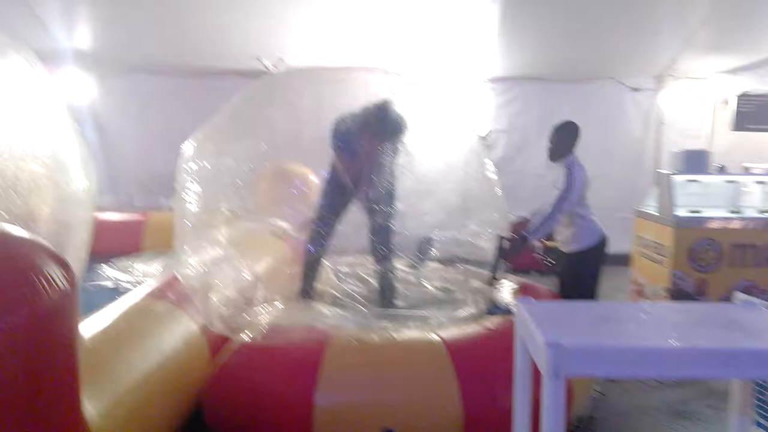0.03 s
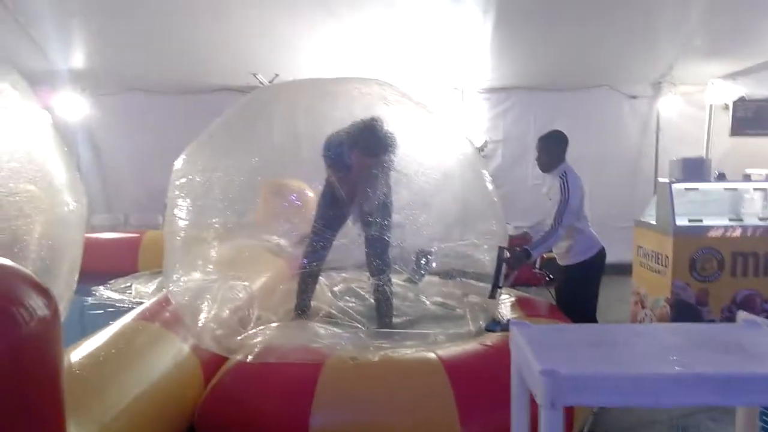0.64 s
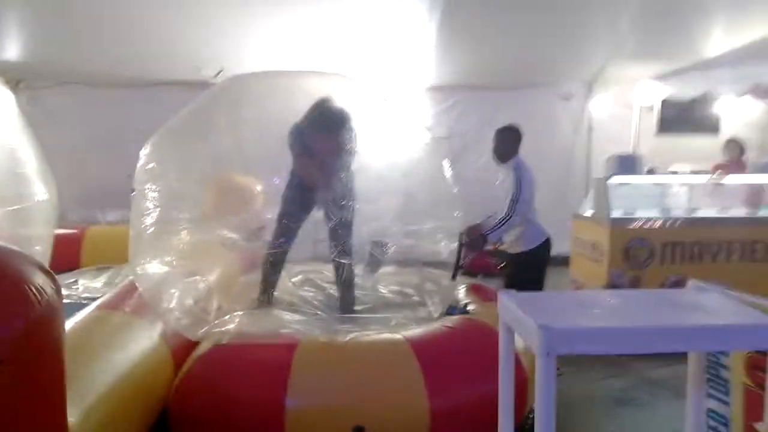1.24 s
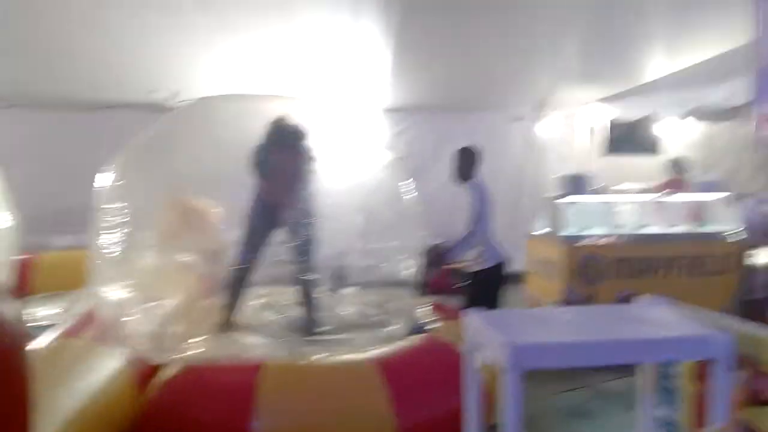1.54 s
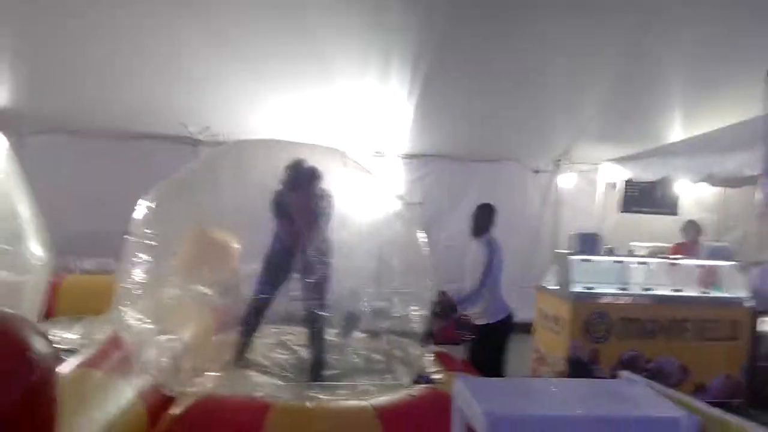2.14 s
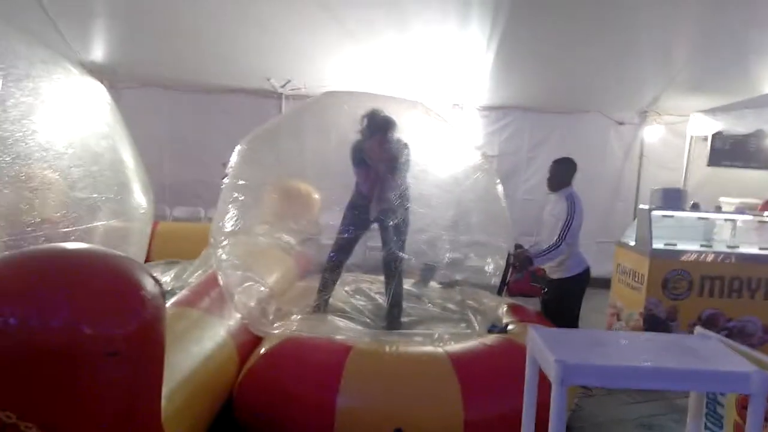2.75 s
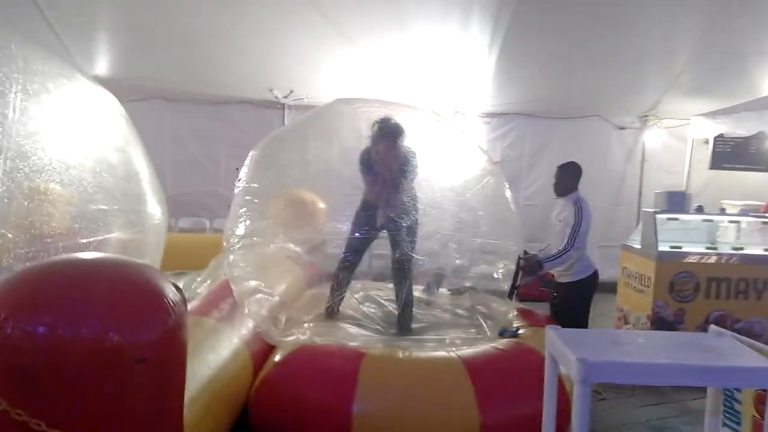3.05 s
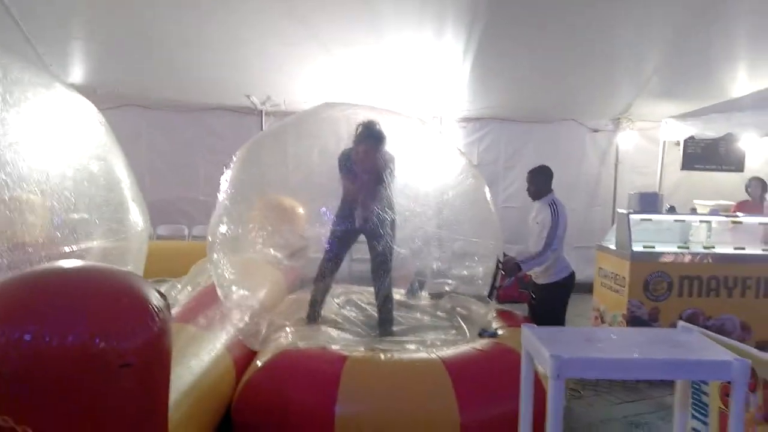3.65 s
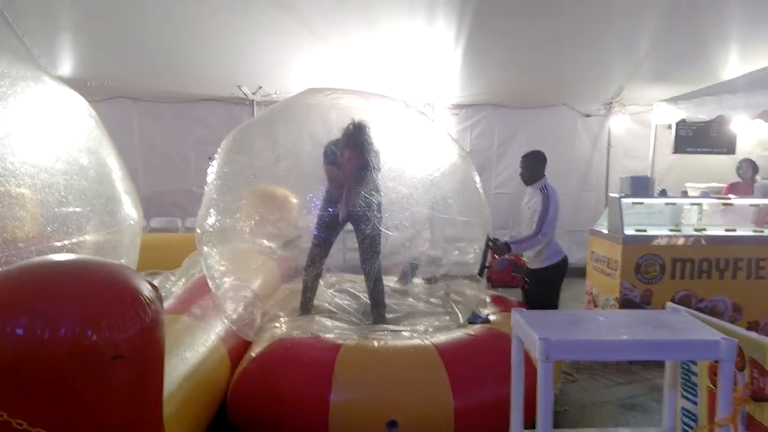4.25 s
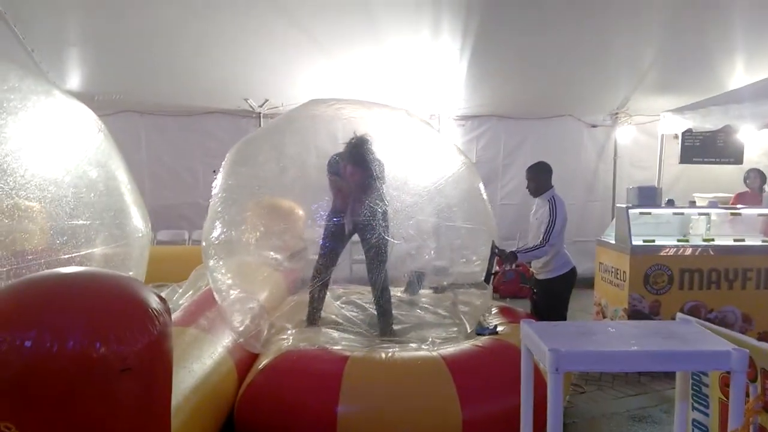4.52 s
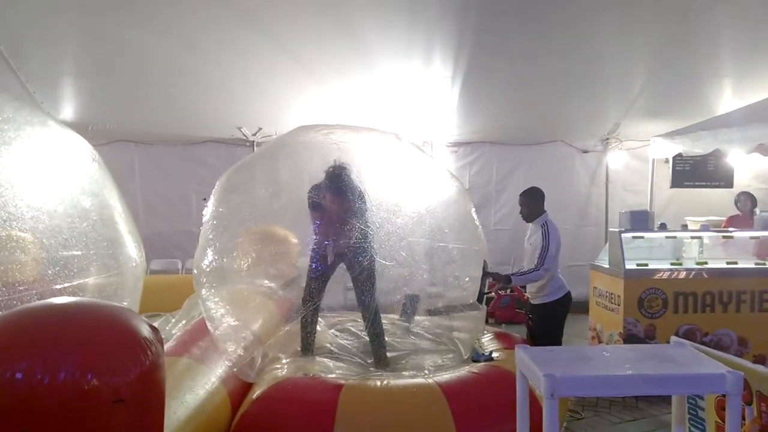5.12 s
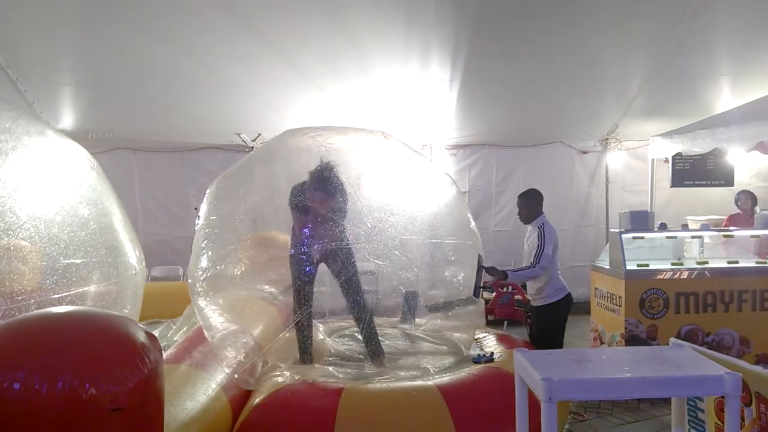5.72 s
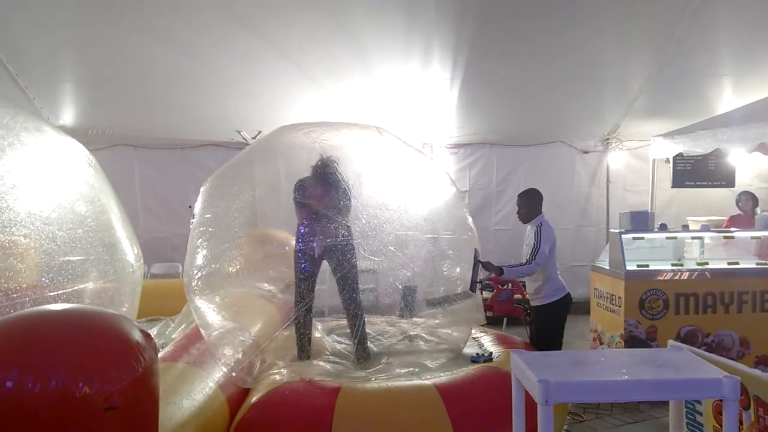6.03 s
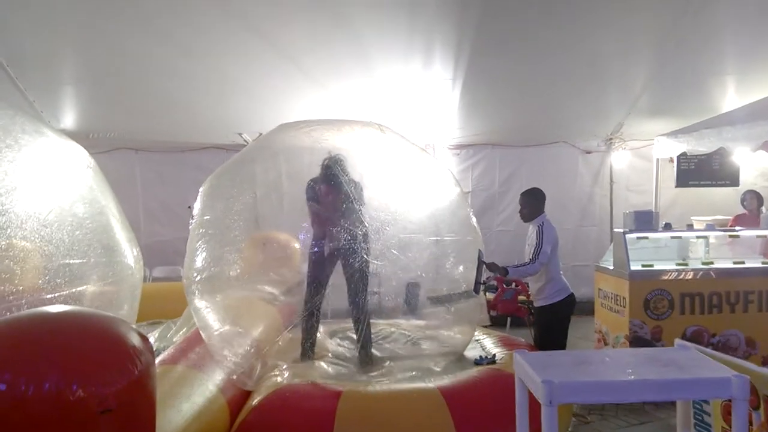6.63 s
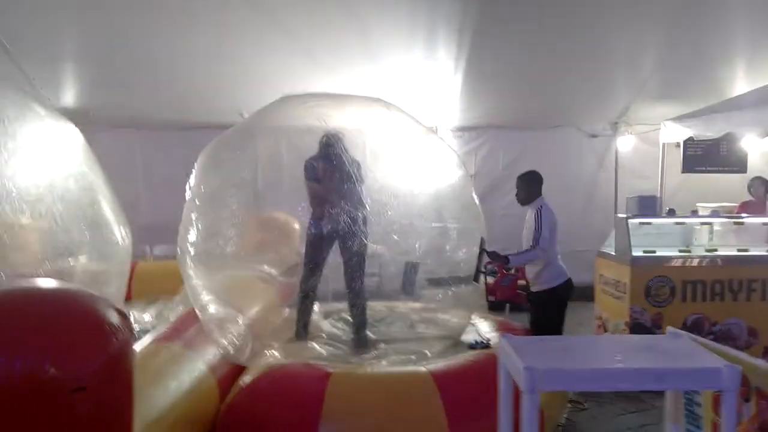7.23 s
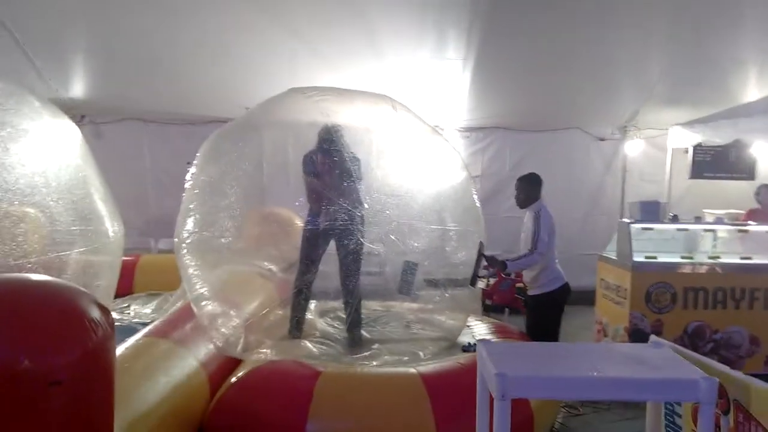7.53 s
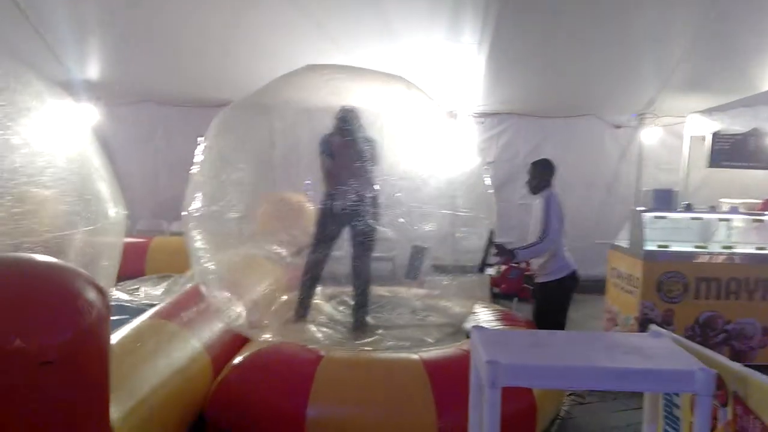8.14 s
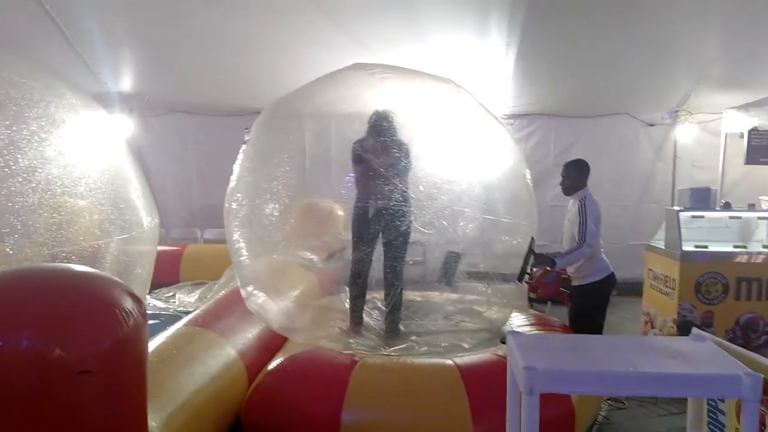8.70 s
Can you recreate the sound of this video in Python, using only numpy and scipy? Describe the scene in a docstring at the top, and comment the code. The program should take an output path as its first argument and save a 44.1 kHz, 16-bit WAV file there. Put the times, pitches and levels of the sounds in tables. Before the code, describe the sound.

An electric blower roars steadily, with hissing air, a high fan whine and a faint generator hum behind it.

```python
"""A roar of air cuts in abruptly, with a jet's hiss and a fan's whine: an electric blower is filling an
inflatable ball in a large tent. Turbulence rings the hose and housing, the blades chop the air into a
tone, and a generator's engine hums further off. Tones swell and sink as a hand-held camera carries its
two microphone ports through the tent's standing waves. At first a finger shades the ports; later the
camera takes one soft bump."""
import sys
import numpy as np
from scipy import signal
from scipy.fft import rfft, irfft, next_fast_len
from scipy.io import wavfile
from scipy.ndimage import uniform_filter1d, map_coordinates

SR = 44100
rng = np.random.default_rng(int(sys.argv[2]) if len(sys.argv) > 2 else 0)


def wav_out(sig):
    """Save sig, one row per channel (or a flat mono array), as 16-bit PCM at SR to the path in sys.argv[1]."""
    wavfile.write(sys.argv[1], SR, np.round(np.clip(np.atleast_2d(sig).T, -1, 1) * 32767).astype(np.int16))


N = 395577

# Level rides of the air layers. Each row: time in seconds, level in dB before trims and swells.
STREAM_RIDE = [(0.8, -22.2), (0.865, -22.2), (0.89, -24.2), (1.02, -24.2), (1.28, -21.8), (1.37, -23.6),
               (1.52, -21.4), (2.0, -20.5), (2.2, -18.3), (2.6, -20), (2.92, -20.5), (3.02, -18.5),
               (3.38, -19.6), (3.54, -22), (3.7, -19.9), (4.06, -18.5), (4.18, -19.8), (4.7, -19.7),
               (4.85, -20.6), (5.33, -21), (5.43, -19.5), (5.55, -20.2), (5.95, -20.8), (6.86, -20.8),
               (7.15, -19.5), (7.36, -20.3), (8.56, -19.8), (8.64, -18.4), (8.96, -20.3)]  # the roar; rumble, blade rush and hiss follow it
RUMBLE_RIDE = [(0.8, -30.5), (1.4, -32), (2.1, -28), (2.7, -32), (3.15, -28), (4.0, -29), (4.6, -26.5),
               (6.1, -29), (7.5, -30.5), (8.2, -30), (8.97, -28)]
LOWER_NOTE_RIDE = [(0.8, -41), (1.98, -44), (2.34, -35), (2.72, -46), (2.96, -27), (3.25, -27), (3.64, -35),
                   (4.1, -25), (4.48, -30.5), (5.16, -35), (5.5, -24.5), (5.85, -31.5), (8.96, -42)]
UPPER_NOTE_RIDE = [(0.8, -33), (1.3, -30), (1.5, -24), (2.3, -25), (2.8, -33), (3.42, -22), (4.0, -23.5),
                   (4.66, -32), (5.5, -27.5), (8.96, -28.5)]
BLADE_RUSH_RIDE = [(0.8, -29), (2.1, -27), (4.2, -27), (6.2, -24.5), (8.97, -26)]
HISS_RIDE = [(0.8, -24.4), (1.0, -26), (1.14, -24.3), (1.27, -24.6), (1.4, -24), (1.55, -24), (1.72, -28.3),
             (2.3, -27.8), (3.25, -26.7), (4.1, -27.8), (5.2, -27.7), (6.2, -27), (7.2, -28), (8.0, -28),
             (8.97, -26.8)]
# EQ curves that colour their noise. Each row: frequency in Hz, relative gain in dB.
RUMBLE_EQ = [(20, -17), (42, -9), (75, 0.5), (160, -1), (260, 0.5), (350, 2), (600, -7), (2000, -58)]
ROAR_EQ = [(100, -40), (260, -18), (340, -11), (450, 1.5), (750, 0), (1080, -0.5), (1350, -4), (1700, -12),
           (2300, -9), (3000, -36)]
LOWER_NOTE_EQ = [(440, -43), (495, -8), (515, 8), (535, -1.5), (600, -43)]
UPPER_NOTE_EQ = [(570, -49), (625, -5), (640, 0), (652, 3), (663, 0), (680, -6), (740, -47)]
BLADE_RUSH_EQ = [(900, -64), (1400, -4), (1560, 0.5), (1720, 3.5), (1950, -3), (2300, -6), (2550, -12.5),
                 (3500, -60)]
HISS_EQ = [(1500, -17), (2500, 0.5), (3500, 0), (4400, -1), (5200, -2), (6000, -1.5), (7300, -3.5),
           (8200, -5.5), (8700, -4.5), (9900, -6), (10900, -9.5), (11900, -9), (13000, -13), (15300, -18)]
# Resonances. Each row: centre in Hz, width in Hz, boost or cut in dB.
HOUSING_PEAKS = [(410, 13, 3), (454, 12, 2), (812, 12, 5), (845, 14, 2), (907, 13, 5.5), (960, 12, 5.5),
                 (1030, 50, 1.5), (1108, 28, 6), (1245, 14, 2.5), (1290, 19, 4.5)]  # hose and housing
FINGER_HOLLOW = [(3760, 880, 12.3), (5600, 900, 1), (13300, 2200, -14)]  # the cavity between finger and ports
# Stereo image at the ports. Each row: frequency in Hz, coherence from 0 to 1,
# phase lead of the left in radians, left over right in dB.
IMAGE = [(60, .91, .7, 0), (300, .68, .1, .7), (700, .81, 0, -.5), (1250, .99, 0, 0), (1360, .98, 0, .6),
         (1600, .86, 0, 4), (1900, .2, 2.6, 5.5), (2250, .75, 3.4, 3), (2680, .96, 3.1, 0),
         (2900, .8, 2.8, -.5), (3300, .35, 1.7, -1.5), (3900, .79, -.1, -1.5), (4600, .48, -1.2, -.5),
         (5300, .83, -3.1, -1), (6000, .52, -3.2, -1.5), (6700, .26, -5.6, -1), (7400, .39, -4.8, -5),
         (8100, .38, -4.3, -5), (8800, .44, -5.6, -6), (9500, .54, -6.4, -8.5), (10800, .15, -10, -8),
         (12200, .54, -12.6, -6.5), (13500, .4, -14.6, -8), (15000, .3, -18.7, -11)]
IMAGE_ASIDE = [(2250, .65, 3.7, 1), (2680, .92, 3, -1), (3300, .65, 1.4, -2), (3900, .88, -.2, -1.5),
               (4600, .55, -1.3, -2.5), (5300, .45, -3.6, -2), (6700, .55, -6.4, -1), (7400, .3, -8.7, -5),
               (8100, .6, -10, -5.5), (9500, .45, -12.6, -9), (10800, .45, -15.8, -8.5),
               (12200, .38, -18.3, -6), (15000, .4, -25, -5)]  # the hiss from one side, before the camera swings round

# Fan speed. Each row: time in seconds, blade-passing frequency in Hz.
BLADE_PITCH = [(0.8, 1497.3), (1.2, 1495.8), (3.3, 1494.8), (4.1, 1494), (4.9, 1490.7), (5.7, 1492.3),
               (7.6, 1493.2), (8.8, 1490.3)]
# The blade tone's first three harmonics in the standing waves.
# Each row: time in seconds, level in dB before panning.
WHINE_RIDE = [(0.8, -26), (0.98, -36), (1.2, -28.5), (1.8, -40), (2.08, -29), (2.28, -36), (2.8, -28.5),
              (3.15, -32), (3.9, -28), (4.12, -32), (4.38, -23), (4.6, -25), (4.8, -20.5), (5.0, -23.5),
              (5.98, -25), (6.25, -22), (7.17, -20.3), (7.35, -17), (7.55, -18.6), (7.7, -26.5),
              (8.22, -20.8), (8.65, -22.3), (8.9, -29)]
SECOND_RIDE = [(0.9, -53), (1.15, -39.5), (1.7, -48), (2.1, -36.5), (2.26, -47), (2.42, -39), (3.15, -39),
               (3.52, -53), (3.98, -39), (4.5, -50), (5.3, -53), (5.6, -41), (5.78, -44), (6, -36.5),
               (6.55, -55), (7, -41), (7.7, -54), (8.22, -42), (8.96, -49)]
THIRD_RIDE = [(0.8, -44), (1.45, -41), (1.65, -47), (2.3, -40), (2.7, -50), (3.3, -37.5), (3.6, -46),
              (4.12, -39), (4.8, -45), (5.35, -48), (5.65, -38), (5.95, -47), (6.3, -35.5), (6.75, -36.5),
              (7.1, -47), (7.33, -35.5), (7.52, -34), (7.85, -44), (8.7, -39), (8.96, -41)]
# Its weak overtones. Each row: harmonic number, centre level in dB, phase between ports in radians.
WEAK_OVERTONES = [(4, -53, 2.1), (5, -53, 1.4), (6, -52, 1.4), (8, -56.5, 1.4), (10, -65, 1.4)]

# The generator's firing hum and cooling fan. Each row: time in seconds, level in dB before trim.
FIRING_RIDE = [(0.8, -37), (1.5, -48), (1.7, -58), (1.97, -37.5), (3.0, -33), (3.42, -30.5), (3.54, -39),
               (4.2, -43), (4.38, -29.7), (4.95, -30.5), (5.45, -37), (5.95, -37), (6.12, -31.5),
               (6.94, -31), (7.08, -37.5), (8.68, -31.5), (8.96, -41)]
COOLING_RIDE = [(0.8, -45), (1.7, -33), (2.3, -34), (2.6, -46), (6.64, -41), (7.24, -37), (7.9, -48),
                (8.45, -29.5), (8.97, -30)]
# Its weaker tones. Each row: multiple of the four-stroke cycle, level in dB.
ENGINE_PARTIALS = [(5, -54), (6, -46), (7, -47.5), (8, -43), (9, -53), (12, -40.5), (19, -47), (20, -47.5)]

# Brief changes of colour: the treble dips as the finger lifts, then bands brighten as the camera turns.
# Each row: middle in seconds, half length in seconds, centre in Hz, width in Hz, boost or cut in dB.
COLOUR_SHIFTS = [(1.614, 0.082, 8100, 5000, -11.5), (1.92, 0.2, 5800, 800, 4), (2.2, 0.35, 1160, 250, 2),
                 (5.247, 0.27, 820, 45, 7.5), (8.1, 0.79, 790, 35, 2.5), (6.35, 0.76, 7800, 600, 6)]
# The low push of the bump. One row: time in seconds, peak level in dB, pitch in Hz.
BUMP_PUSH = (5.447, -20, 60)

BLADE_COUNT = 6
TIME = np.arange(N) / SR


def amp(db):
    """Decibels to gain."""
    return 10 ** (np.asarray(db) / 20)


def unit(x):
    """Scale so that the mono mix has rms 1."""
    mono = np.atleast_2d(x).mean(axis=0)
    return x / np.sqrt(np.mean(mono ** 2) + 1e-20)


def along(rows, hz):
    """Each column of a frequency table, read at hz on a log axis."""
    freqs, *columns = np.transpose(rows)
    return [np.interp(np.log(hz + 1), np.log(freqs + 1), column) for column in columns]


def ride(rows):
    """An automation curve: straight lines between breakpoints, one value a sample."""
    return np.interp(TIME, *np.transpose(rows))


def wobble(rate):
    """A smooth random curve, rate knots a second."""
    knots = rng.standard_normal(int(N * rate / SR) + 4)
    coarse = np.arange(0, N + 32, 32)
    smooth = map_coordinates(knots, [coarse * rate / SR], mode="nearest")
    return np.interp(np.arange(N), coarse, smooth)


def filtered(x, response):
    """Filter x by a gain given as a function of Hz."""
    size = next_fast_len(N + SR // 4)
    return irfft(rfft(x, size) * response(np.fft.rfftfreq(size, 1 / SR)), size)[..., :N]


def bells(peaks, hz):
    """Boost or cut in dB from a set of resonances."""
    return sum(db / (1 + (2 * (hz - centre) / width) ** 2) for centre, width, db in peaks)


def at_ports(hz, image=IMAGE):
    """Complex left and right gains for the sound the ports share and the sound opposed between them."""
    coherence, lead, tilt_db = along(image, hz)
    spread = np.arccos(np.clip(coherence, 0, 1)) / 2
    sides = np.array([amp(tilt_db / 2) * np.exp(.5j * lead), amp(-tilt_db / 2) * np.exp(-.5j * lead)])
    sides = sides / np.linalg.norm(sides, axis=0)
    return sides * np.cos(spread), sides * np.sin(spread) * [[1], [-1]]


def rush(eq, patchy_db, peaks=(), image=IMAGE):
    """Turbulent stereo noise of rms 1, with drifting patches of gain and steady resonances."""
    cells = signal.stft(rng.standard_normal((2, N)), nperseg=512)[2]
    patches = uniform_filter1d(rng.standard_normal(cells.shape[1:]), size=5, axis=0)  # across pitch
    patches = uniform_filter1d(patches, size=14, axis=1)  # across time
    noise = signal.istft(cells * amp(patchy_db * patches / patches.std()), nperseg=512)[1][:, :N]
    size = next_fast_len(N + SR // 4)
    hz = np.fft.rfftfreq(size, 1 / SR)
    mid, side = rfft(noise, size)
    shared, opposed = at_ports(hz, image)
    colour = amp(along(eq, hz)[0] + bells(peaks, hz))
    return unit(irfft((mid * shared + side * opposed) * colour, size)[:, :N])


def tone(phase, scatter, rate):
    """A tone of rms 1: a steady direct part plus echoes that waver in level and phase."""
    swing = 1 + scatter * (wobble(rate) + 1j * wobble(rate))
    envelope = np.abs(swing)
    return np.sqrt(2 / np.mean(envelope ** 2)) * envelope * np.cos(phase + np.angle(swing))


def blower_air(stream_db):
    """Rushing air: low rumble, a roar through the housing, the duct's two notes and blade rush."""
    swell_db = stream_db - stream_db.mean()
    rumble_db = ride(RUMBLE_RIDE) + 0.66 * swell_db + 0.58 * wobble(rate=3.07)
    rumble = amp(rumble_db) * rush(RUMBLE_EQ, patchy_db=0.5)
    roar = amp(stream_db + 0.96) * rush(ROAR_EQ, patchy_db=0.9, peaks=HOUSING_PEAKS)
    lower_note = amp(ride(LOWER_NOTE_RIDE) + 1) * rush(LOWER_NOTE_EQ, patchy_db=0.5)
    upper_note = amp(ride(UPPER_NOTE_RIDE) - 3.5) * rush(UPPER_NOTE_EQ, patchy_db=0.5)
    blades = amp(ride(BLADE_RUSH_RIDE) + 0.64 * swell_db) * rush(BLADE_RUSH_EQ, patchy_db=1.5)
    return rumble + roar + lower_note + upper_note + blades


def jet_hiss(stream_db):
    """The jet follows the stream and throbs with each fan turn; its image shifts as the camera swings."""
    swing_middle_s, swing_length_s = 2.25, 0.6
    shaft_phase = 2 * np.pi * np.cumsum(ride(BLADE_PITCH) / BLADE_COUNT) / SR
    throb = 1 + 0.027 * np.sin(shaft_phase)
    facing = np.clip((TIME - swing_middle_s) / swing_length_s + .5, 0, 1)
    ahead, aside = [rush(HISS_EQ, patchy_db=1.45, image=image) for image in (IMAGE, IMAGE_ASIDE)]
    jet = np.sqrt(facing) * ahead + np.sqrt(1 - facing) * aside
    swell_db = stream_db - stream_db.mean()
    return amp(ride(HISS_RIDE) + 0.88 * swell_db) * throb * jet


def fan_whine():
    """Blades chop the air into a whine whose harmonics swell and fade in the standing waves."""
    phase = 2 * np.pi * np.cumsum(ride(BLADE_PITCH) + 0.3 * wobble(rate=12)) / SR
    direct = tone(phase, scatter=0.115, rate=36)
    echoes = np.array([tone(phase, scatter=1.3, rate=22) for _ in range(2)])
    lean_left = amp([[1.3], [-1.3]])
    whine = amp(ride(WHINE_RIDE)) * lean_left * unit(direct + 0.17 * echoes)
    imbalance_hum = amp(-46) * tone(phase / BLADE_COUNT, scatter=0.3, rate=5)  # once a rotor turn
    harmonics = [(2, ride(SECOND_RIDE), 2.15), (3, ride(THIRD_RIDE), 1.3)]  # number, dB, radians
    harmonics += [(k, db + 5 * wobble(rate=4.5), lag) for k, db, lag in WEAK_OVERTONES]
    for k, db, lag in harmonics:
        shared, _ = at_ports(np.array([k * BLADE_PITCH[0][1]]))
        pair = np.array([tone(k * phase + shift, scatter=0.34, rate=40) for shift in (0, lag)])
        whine = whine + amp(db) * unit(np.abs(shared) * pair)
    return whine + imbalance_hum


def generator(cycle_hz=14.93):
    """Four cylinders fire once each a cycle; their unevenness adds partials, and the cooling fan sings."""
    phase = 2 * np.pi * cycle_hz * TIME
    port_phase = np.array([[.42], [-.42]])
    firing = amp(ride(FIRING_RIDE) - 2.5) * np.sqrt(2) * np.sin(4 * phase + port_phase)
    cooling = amp(ride(COOLING_RIDE) + 3) * tone(38 * phase, scatter=.3, rate=8)
    partials = sum(amp(db) * tone(k * phase + rng.uniform(0, 2 * np.pi), scatter=0.4, rate=4)
                   for k, db in ENGINE_PARTIALS)
    return firing + cooling + partials


def finger_shade(x, lifts_at_s=1.58, lift_length_s=0.13):
    """The hollow under a finger rings, dulls the top and tips the sound right until the finger lifts."""
    shaded = np.clip((lifts_at_s - TIME) / lift_length_s + .5, 0, 1)
    covered = amp([[-.5], [1.2]]) * filtered(x, lambda hz: amp(bells(FINGER_HOLLOW, hz)))
    return x + shaded * (covered - x)


def colour_shifts(x):
    """The treble dips briefly as the finger lifts, then single bands brighten as the camera turns."""
    out = x
    for middle_s, half_s, centre, width, db in COLOUR_SHIFTS:
        change = filtered(x, lambda hz: amp(bells([(centre, width, db)], hz)) - 1)
        out = out + np.exp(-((TIME - middle_s) / half_s) ** 2) * change
    return out


def camera_bump():
    """One soft low push through the camera body, with a short hollow knock and a hard contact tick."""
    at_s, push_db, push_hz = BUMP_PUSH
    t = TIME - at_s
    push = -amp(push_db) * np.cos(2 * np.pi * push_hz * t) * np.exp(-(t / 0.0093) ** 2)
    hollow = np.sin(2 * np.pi * 520 * t) + .5 * np.sin(2 * np.pi * 660 * t)
    knock = amp(-15) * hollow * np.exp(-(t / 0.01) ** 2)
    tick = -amp(-4) * np.exp(-(t / 0.00011) ** 2)
    return push + knock + tick


def scene():
    """A bed of air that shifts in colour, with the whine, the generator and the bump on top."""
    stream_db = ride(STREAM_RIDE) + 0.33 * wobble(rate=12)  # turbulence flutters the stream
    bed = colour_shifts(blower_air(stream_db) + jet_hiss(stream_db))
    return bed + fan_whine() + generator() + camera_bump()


def record(dry):
    """The camera's ear: a finger over the ports, a hard cut in and a steep low-pass."""
    cut_in_s, top_hz = 0.797, 15480
    gate = np.clip((TIME - cut_in_s) / 0.001, 0, 1)
    return filtered(finger_shade(dry) * gate, lambda hz: np.clip((top_hz - hz) / 60 + .5, 0, 1))


dry = scene()
out = record(dry)
wav_out(out)
```